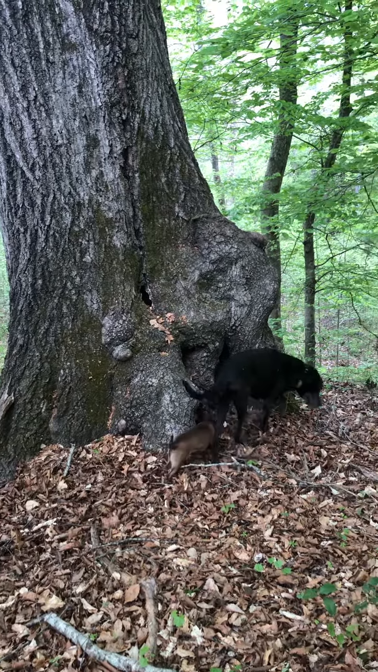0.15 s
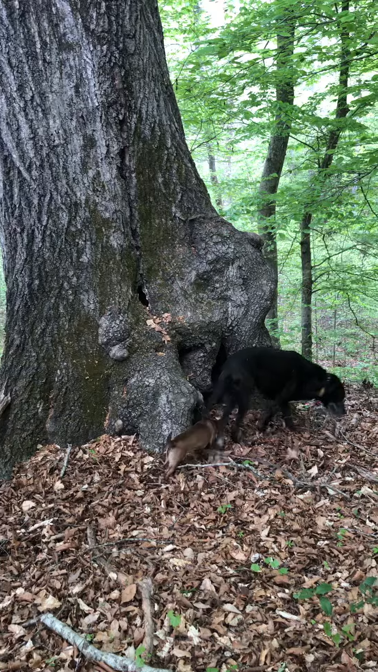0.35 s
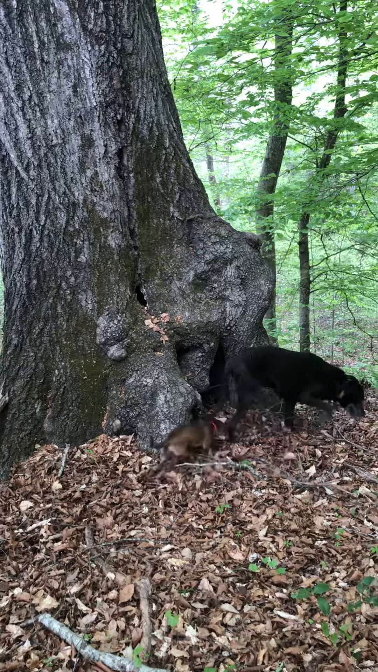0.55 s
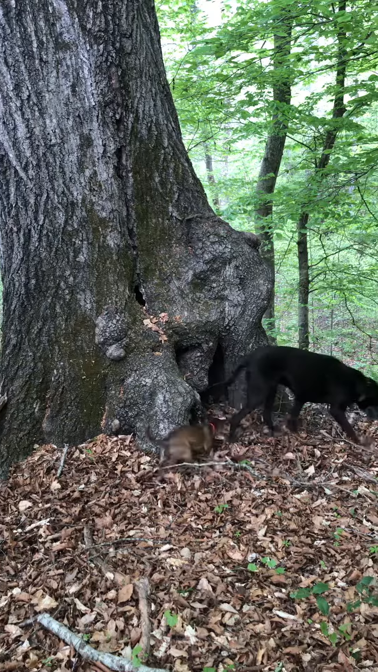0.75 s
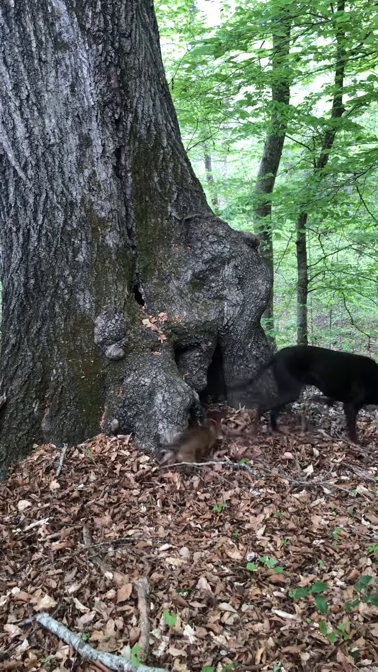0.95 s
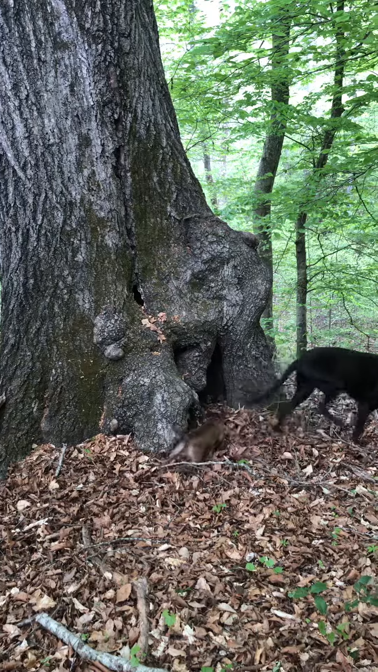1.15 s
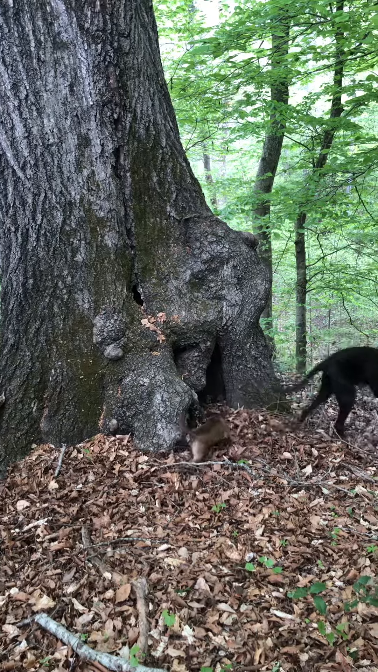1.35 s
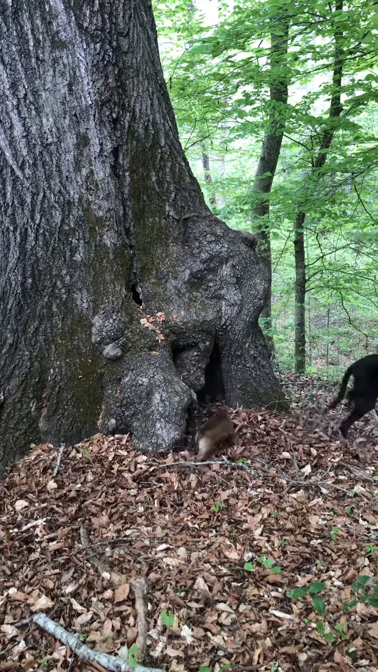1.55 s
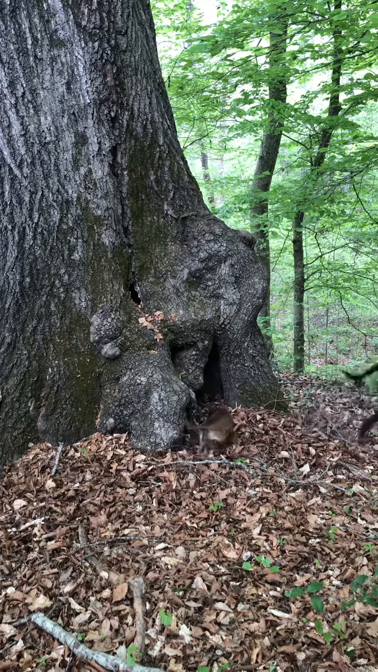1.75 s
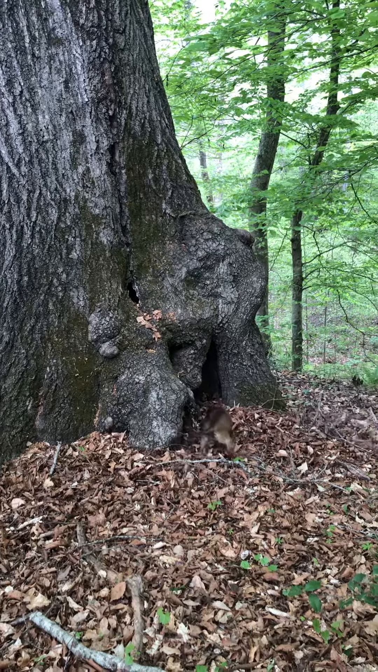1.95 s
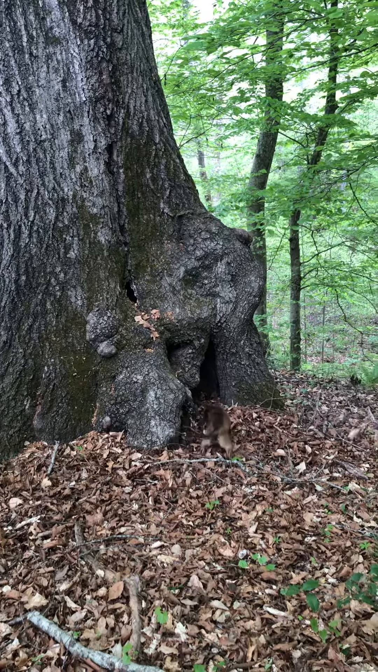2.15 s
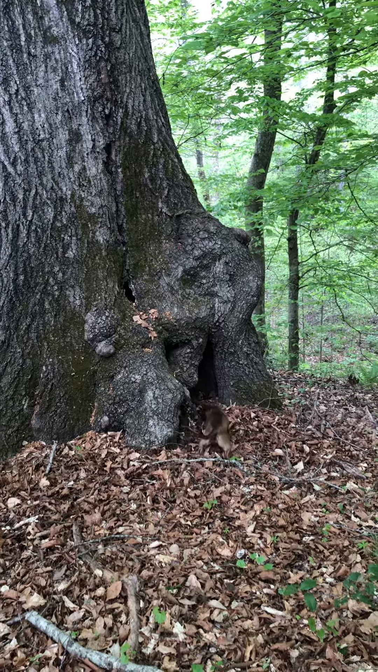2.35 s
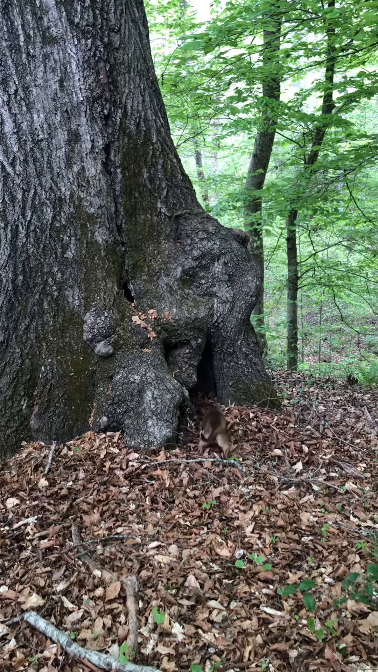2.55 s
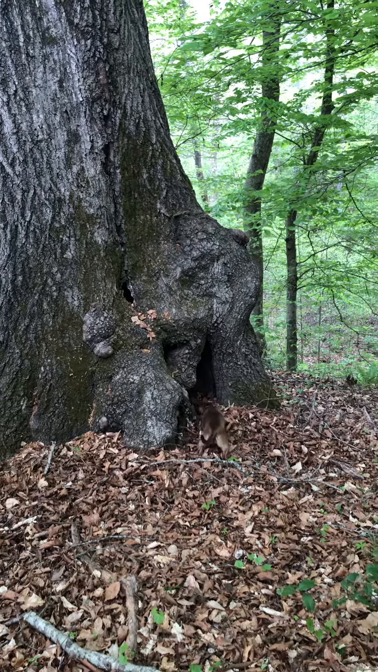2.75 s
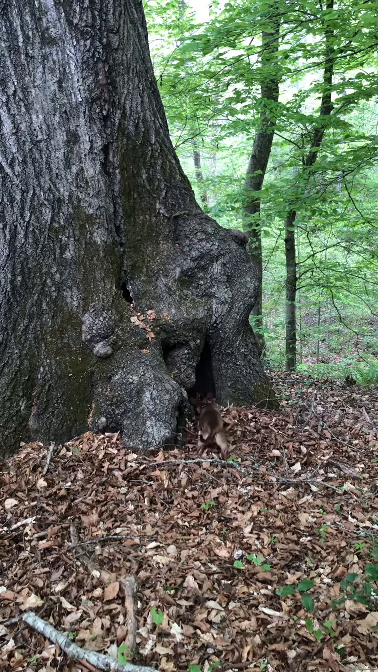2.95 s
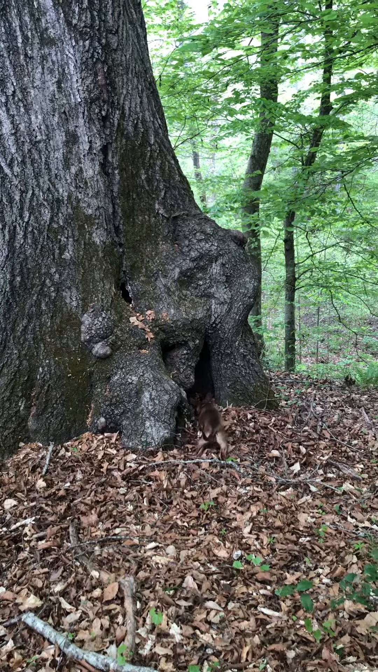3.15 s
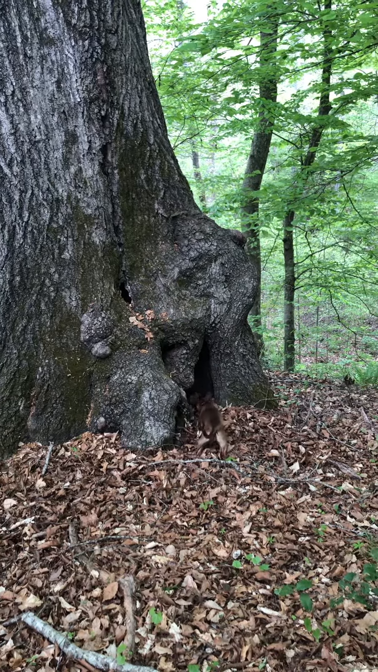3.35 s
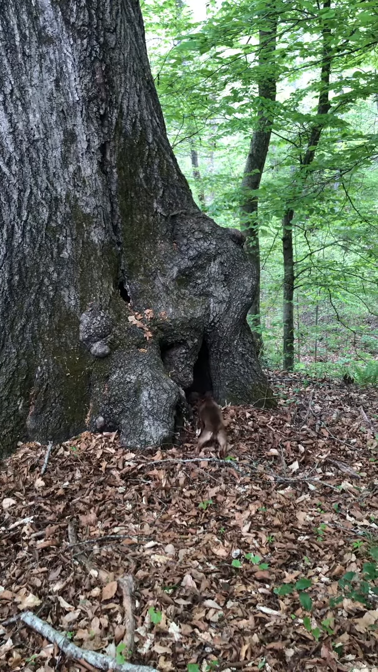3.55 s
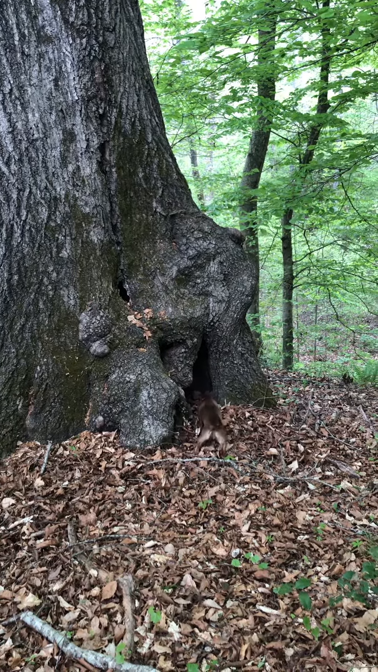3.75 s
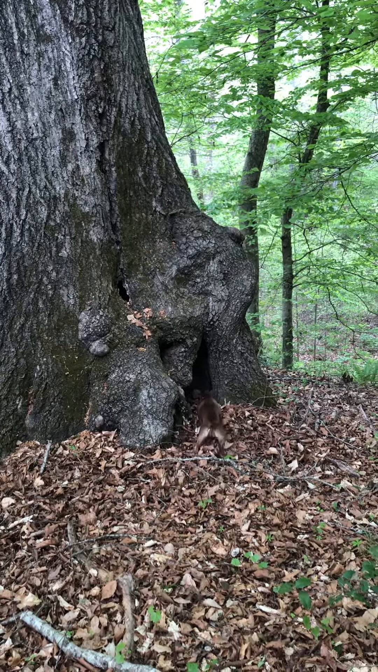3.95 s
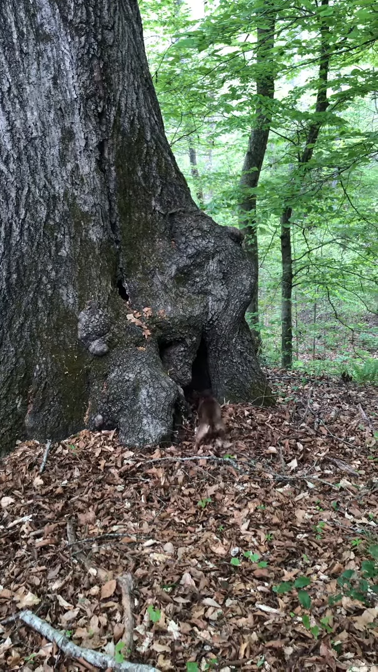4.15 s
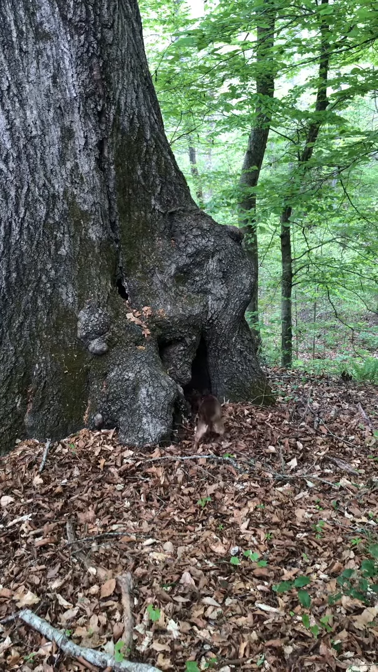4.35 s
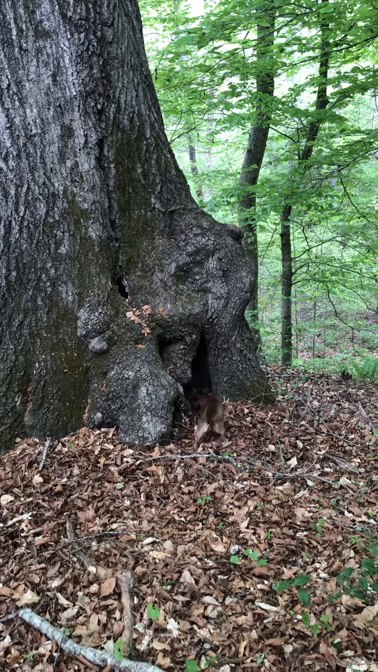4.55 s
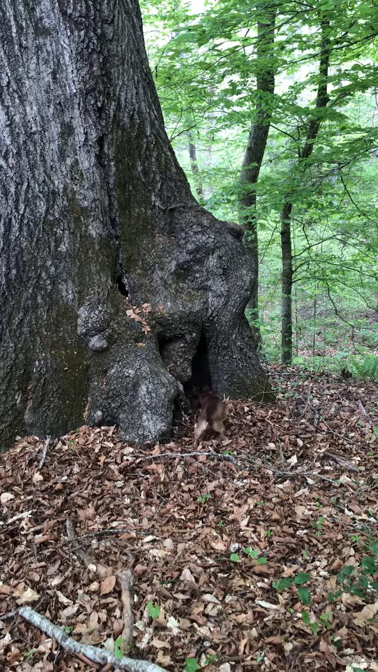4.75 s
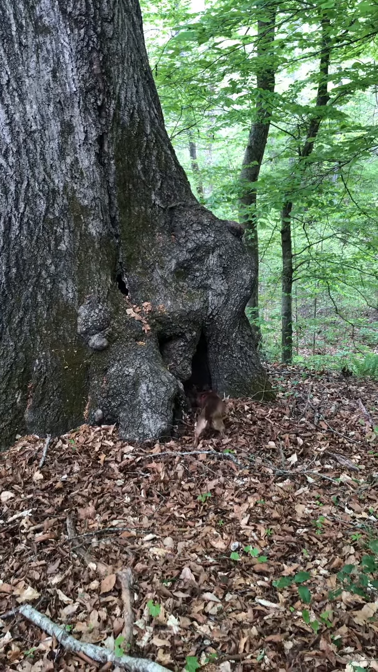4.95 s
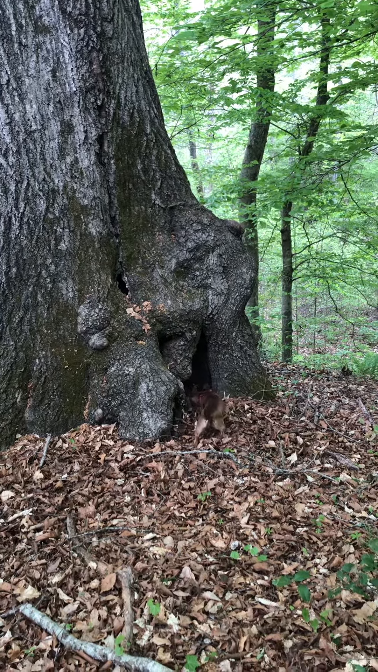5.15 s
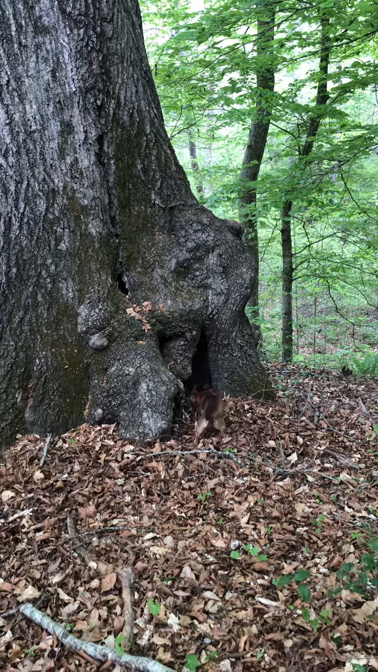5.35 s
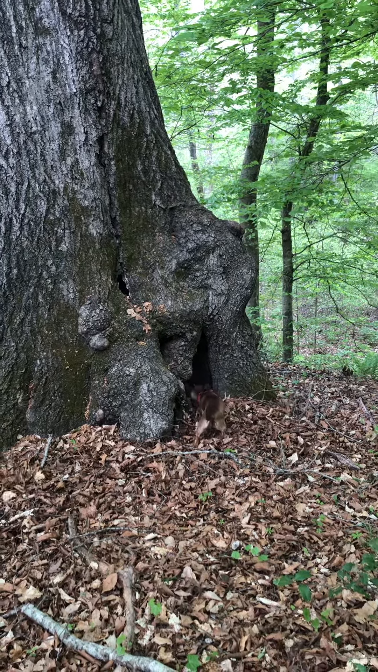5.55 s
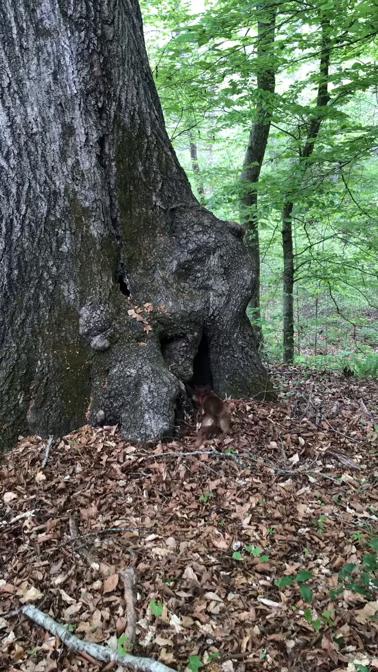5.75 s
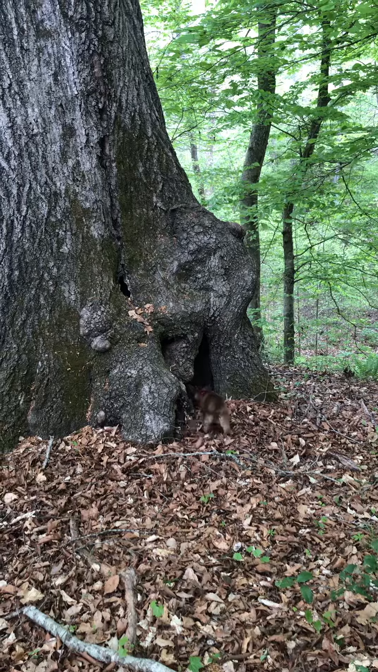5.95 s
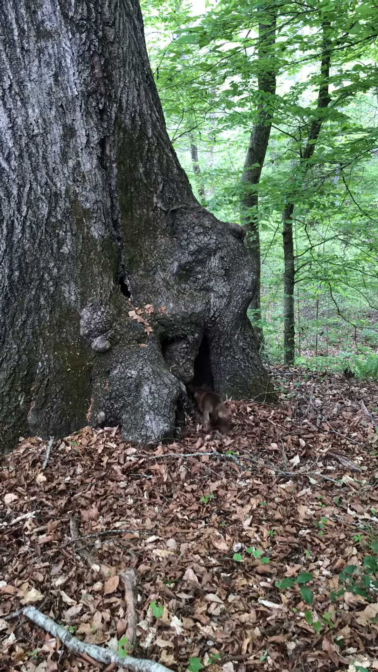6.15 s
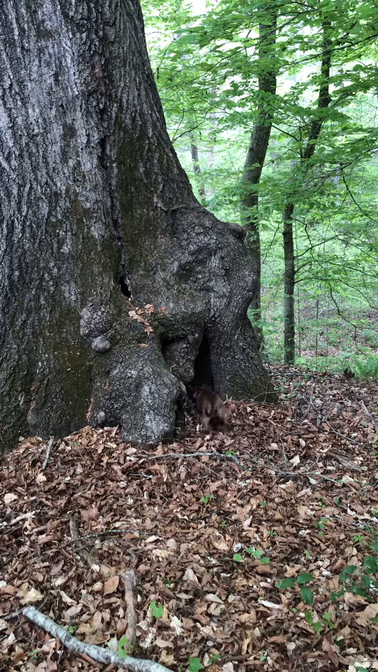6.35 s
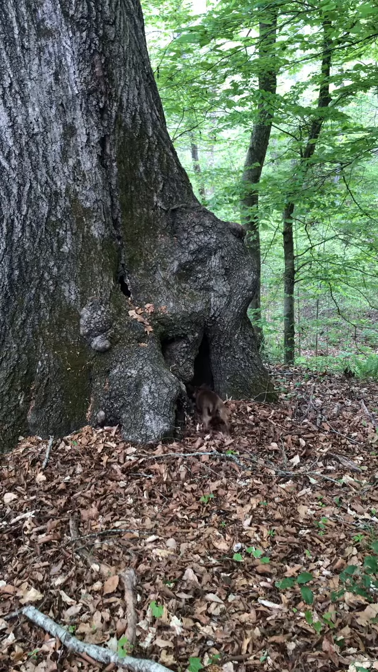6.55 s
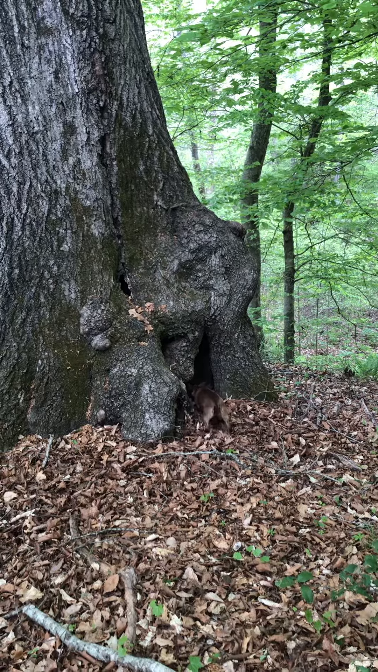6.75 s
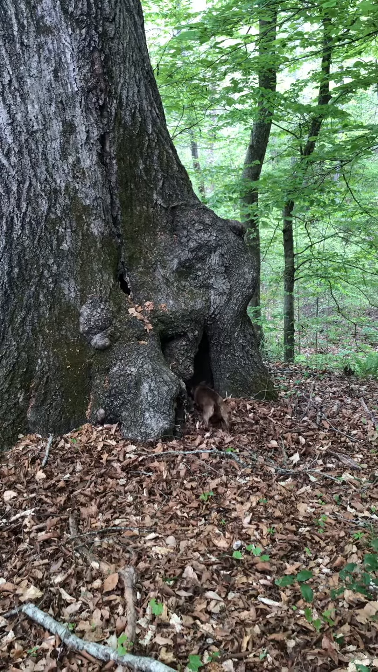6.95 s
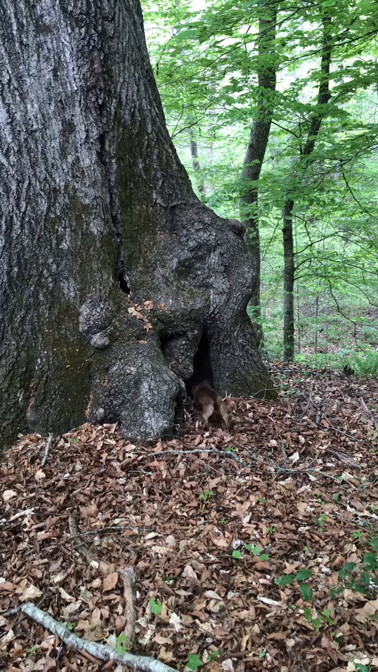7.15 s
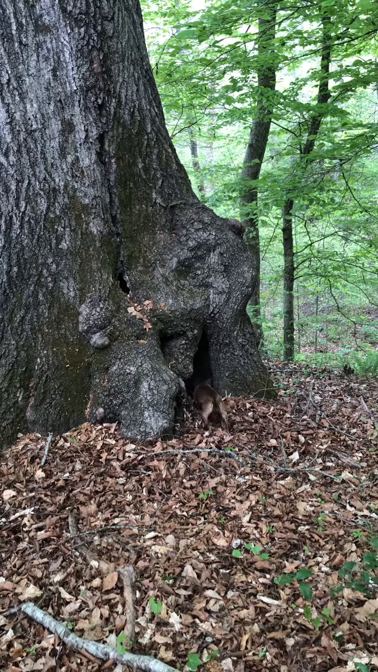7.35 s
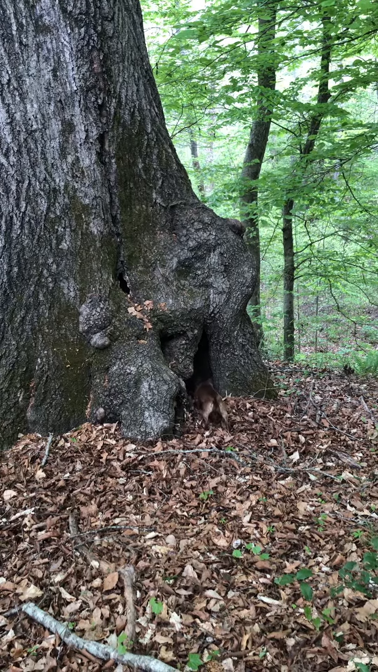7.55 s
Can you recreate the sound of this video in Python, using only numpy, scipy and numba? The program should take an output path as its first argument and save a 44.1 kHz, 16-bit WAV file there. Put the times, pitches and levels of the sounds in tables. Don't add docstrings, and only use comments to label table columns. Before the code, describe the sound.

In a forest, a big dog walks off through dry leaves some metres away, its paw strokes crunching in dense crackly bursts with sharp twig snaps. The crunching thins and fades to a brief hush, then a small dog scratches in a hollow, hesitantly at first, then busier. Faint bird whistles, a low hum and far traffic rumble lie behind, caught by a phone microphone.

```python
import sys
import numpy as np
from scipy import signal
from scipy.fft import rfft, irfft
from scipy.io import wavfile
from scipy.ndimage import uniform_filter1d
from numba import njit

SR = 44100
rng = np.random.default_rng(int(sys.argv[2]) if len(sys.argv) > 2 else 0)


def natural_amplitude(level_db):
    exponent = np.asarray(level_db, float) / 20
    return 10 ** exponent


def unload_wav(signal):
    wavfile.write(
        sys.argv[1],
        SR,
        np.round(np.clip(np.atleast_2d(signal).T, -1, 1) * 32767).astype(np.int16),
    )


N = 339129


def band(x, lo_hz, hi_hz):
    return signal.sosfilt(signal.butter(2, [lo_hz, min(hi_hz, 0.45 * SR)], "bandpass", fs=SR, output="sos"), x)


def level(x, db):
    return x * natural_amplitude(db) / np.sqrt(np.mean(x ** 2))


def lookup(spectrum, hz):
    f, db = np.transpose(spectrum)
    return np.interp(np.log(hz), np.log(f), db)


def walk(rate):
    hold = int(SR / rate)
    steps = np.repeat(rng.standard_normal(N // hold + 1), hold)
    return 4 / 3 * uniform_filter1d(uniform_filter1d(steps, hold), hold)[:N]


def decay(x, seconds):
    return signal.lfilter([1], [1, -np.exp(-1 / (seconds * SR))], x)


# [t/s, level/dB]
STIRRING = [(0.0, -68), (0.25, -55), (0.5, -47.5), (0.74, -50.5), (0.99, -49.5), (1.24, -58.5),
            (1.49, -45.5), (1.74, -52), (2.23, -58), (2.73, -60.5), (3.1, -54.5), (3.72, -64),
            (4.22, -60.5), (4.47, -80), (4.7, -72.5), (5.0, -78.5), (6.3, -69), (7.69, -60)]
# [crest t/s, level/dB, rise/ms, fall/ms]
PAW_STEPS = [(0.046, -49, 42, 67), (0.215, -44, 20, 80), (0.508, -45, 55, 39), (0.686, -40.5, 22, 38),
             (0.856, -45.5, 65, 43), (1.178, -46, 19, 46), (1.291, -42, 31, 78), (1.513, -50, 17, 13),
             (1.888, -46.5, 103, 30), (1.993, -49.5, 19, 40), (2.136, -49.5, 37, 26),
             (2.321, -48.5, 28, 30), (2.442, -56.5, 37, 16), (2.578, -50.5, 16, 27), (2.612, -51, 13, 24),
             (2.841, -55.5, 6.2, 9), (2.954, -53, 8, 56), (3.07, -47, 22, 35), (3.125, -51.5, 14, 15),
             (3.186, -53.5, 9, 16), (3.396, -50, 25, 36), (3.668, -51.5, 20, 49), (4.02, -52.5, 97, 27),
             (4.168, -58.5, 5.5, 37), (4.23, -59, 15, 15), (4.28, -56.5, 25, 19), (4.397, -56, 29, 81)]
# [crest t/s, level/dB, rise/ms, fall/ms]
PAW_SCRAPES = [(4.765, -76, 5, 82), (4.909, -75, 44, 9), (5.052, -73, 7, 12), (5.29, -68, 31, 20),
               (5.605, -72.5, 56, 10), (5.745, -59, 26, 69), (5.901, -51, 10.5, 46), (6.0, -56, 9.1, 20),
               (6.084, -57, 61, 103), (6.435, -57.5, 61, 8.9), (6.498, -53, 12, 39), (6.57, -61.5, 120, 60),
               (6.657, -52.5, 7.6, 26), (6.76, -64, 83, 69), (6.866, -50, 46, 17), (6.969, -48, 23, 65),
               (7.17, -54.5, 190, 84), (7.24, -56, 8, 91), (7.325, -52.5, 17, 40), (7.41, -49, 20, 28),
               (7.533, -52, 28, 39), (7.673, -53, 22, 150)]


def effort():
    t = np.arange(N) / SR
    stir_db = np.interp(t, *np.transpose(STIRRING))
    dull_db = 0.29 * np.maximum(-54.5 - stir_db, 0)
    tilt_db = np.array([-8.5 + dull_db, 0 * t, -2.5 - 0.37 * dull_db])
    power = natural_amplitude(2 * (stir_db + tilt_db))
    for strokes, low_db, thin_db in ((PAW_STEPS, -10, -1), (PAW_SCRAPES, -9.5, -2)):
        for crest, db, rise_ms, fall_ms in strokes:
            first = max(0, int((crest - 0.004 * rise_ms) * SR))
            near = slice(first, int((crest + 0.004 * fall_ms) * SR))
            ms = 1000 * (t[near] - crest)
            swell = np.exp(-(ms / np.where(ms < 0, rise_ms, fall_ms)) ** 2)
            power[:, near] += natural_amplitude(2 * (db + np.array([[low_db], [0], [thin_db]]))) * swell
    settle_db, settle_s = -12.5, 0.046
    keep = np.exp(-1 / (settle_s * SR))
    return power + natural_amplitude(2 * settle_db) * signal.lfilter([1 - keep], [1, -keep], power)


@njit
def rings(start, hz, cycles, size):
    out = np.zeros(N)
    for k in range(len(start)):
        turn = np.exp((2j * np.pi - 1 / cycles[k]) * hz[k] / SR)
        z = size[k] + 0j
        for i in range(int(start[k]), min(N, int(start[k] + 6 * cycles[k] * SR / hz[k]) + 2)):
            z *= turn
            out[i] += z.imag
    return out


# [f/Hz, level/dB per Hz]
LEAF_COLOUR = [(120, -24), (200, 3), (227, -1.5), (340, -19.5), (465, -7.5), (821, -11), (1100, -8),
               (2210, -4.5), (3430, 0.5), (4680, 0), (11100, -2.5), (13300, -0.5), (16000, -4.5)]


def swarm(spread_db, cycles, patchy_db, clump_db, rub_db, buckle):
    cracks_per_s = 14000
    chance = rng.random((int(cracks_per_s * N / SR), 5)).T
    start, hz = chance[0] * N, 250 * 64 ** chance[1]
    strength = np.minimum(-np.log(chance[2] + 1e-9), 6.5)
    turns = cycles * 6 ** chance[4]
    size = hz * natural_amplitude(lookup(LEAF_COLOUR, hz) + spread_db * strength) / np.sqrt(turns)
    size = size * np.sign(chance[3] - 0.5)
    bins = np.fft.rfftfreq(N, 1 / SR) + 1
    rub = irfft(rfft(rng.standard_normal(N)) * natural_amplitude(lookup(LEAF_COLOUR, bins)), N)
    buckles = (rng.random(N) < 90 / SR) * rng.random(N) ** 2
    patches = natural_amplitude(patchy_db * walk(35)) * (1 + buckle * decay(buckles, 0.0051))
    parts = []
    for lo, hi in ((200, 1900), (1900, 8000), (8000, 17000)):
        m = (hz >= lo) & (hz < hi)
        cracks = rings(start[m], hz[m], turns[m], size[m])
        both = level(cracks, 0) + level(band(rub, lo, hi), rub_db)
        edges = np.geomspace(0.8 * lo, 1.2 * hi, 6)
        clumps = 0
        for k in range(5):
            clumps = clumps + (-1) ** k * band(both, *edges[k:k + 2]) * natural_amplitude(clump_db * walk(28))
        parts.append(level(clumps * patches, 0))
    return parts


def leaves():
    at, peak_db, _, body_db, edge_db, after_db = np.transpose(all_snaps())
    parts = swarm(spread_db=2.1, cycles=0.9, patchy_db=0.7, clump_db=1.3, rub_db=-3.5, buckle=0.85)
    tilts_db = (0.7 * body_db - 1, -7, 0.7 * edge_db + 1)
    out = 0
    for part, steady, part_db, tilt_db in zip(parts, effort(), (1.6, 1.5, 1.4), tilts_db):
        kicks = np.zeros(N)
        kicks[(at * SR).astype(int) + 60] = natural_amplitude(peak_db + after_db + tilt_db)
        flare = decay(kicks, 0.008)
        out = out + part * np.sqrt(natural_amplitude(2 * part_db) * steady + flare ** 2)
    return out


# [t/s, peak level/dB, ring f/Hz, crackle level/dB after it]
TWIG_BREAKS = [(0.1017, -23, 5040, -21), (0.2232, -19, 5000, -14), (0.2374, -15, 4340, -12),
               (0.2942, -10, 12800, -19), (0.9697, -24.5, 5460, -15), (1.1727, -27, 4210, -20),
               (2.0847, -30, 4790, -21), (2.2318, -41, 3960, -19), (2.4857, -40, 4550, -11),
               (2.7077, -38, 1210, -9), (2.9816, -32, 5700, -7), (3.3677, -46, 4590, -24),
               (3.1777, -29, 3350, -22), (4.6533, -47, 2500, -18), (0.2958, -17, 900, -26),
               (6.3389, -38.5, 1470, -12), (6.499, -26.5, 3350, -28), (6.6492, -42, 3120, -19),
               (6.7839, -39, 1100, -13), (6.9345, -39.5, 2860, -9), (7.0822, -35, 7240, -11),
               (7.16, -28.5, 5240, -11.5)]
# [t/s, peak level/dB, ring f/Hz, crackle level/dB after it]
LEAF_SPLITS = [(0.0388, -25.5, 4140, -9.5), (0.2036, -31, 4800, -7), (0.4199, -30, 6440, -13),
               (0.5003, -21, 5550, -8.5), (0.6594, -20, 12700, -23), (0.8076, -16, 11000, -15),
               (0.8081, -14.5, 3840, -19.5), (1.5459, -20, 13000, -16), (1.7734, -21, 3220, -15),
               (1.7864, -32, 5920, -22), (2.1196, -26.5, 5460, -10.5), (2.1274, -30, 7290, -20),
               (2.3067, -37, 7210, -16), (2.4354, -31, 4670, -11.5), (2.5651, -45, 3380, -13),
               (2.7377, -46, 4760, -8), (2.9432, -31, 3220, -10), (3.6287, -36, 4620, -15),
               (3.6804, -26, 7630, -20), (3.9554, -29, 3440, -17), (4.4184, -34, 5630, -16),
               (5.5747, -41, 5800, -19), (4.8638, -51, 3510, -19), (5.3378, -48, 3260, -19),
               (6.3713, -37, 5000, -24), (6.8188, -24.5, 4940, -11.5), (6.961, -25, 4220, -19),
               (7.2229, -20, 5200, -21), (7.4858, -28, 5300, -16), (0.7355, -17, 6000, -14.5)]
# [t/s, peak level/dB, ring f/Hz, crackle level/dB after it]
LEAF_POPS = [(0.2626, -21, 12500, -18), (0.5711, -28, 3550, -17), (1.2615, -32, 6990, -19),
             (1.2101, -20, 3880, -22), (1.6965, -28, 8300, -19), (1.9021, -26.5, 3530, -13),
             (3.0624, -30, 3610, -17), (3.3847, -34, 6400, -24), (3.5478, -35, 9500, -21),
             (3.6646, -21.5, 6550, -16), (3.8661, -42, 7260, -19), (3.8911, -37, 4640, -21),
             (4.1649, -31.5, 5100, -10), (4.2283, -37, 9600, -10), (4.7656, -52, 4260, -19),
             (4.9033, -43, 5150, -15), (5.1093, -53, 6000, -19), (5.5749, -39, 13800, -25),
             (5.3926, -54, 3270, -19), (5.7233, -40, 3760, -19), (5.7951, -38, 3300, -21),
             (5.8949, -27.5, 4530, -23), (5.9937, -38, 3250, -23), (6.5315, -39, 4290, -19),
             (7.0378, -33, 7100, -6), (7.3596, -31, 5420, -19), (7.6729, -22.5, 6860, -17)]
# [t/s, peak level/dB, ring f/Hz, crackle level/dB after it]
STICK_KNOCKS = [
    (0.1476, -25, 2270, -19),
    (0.387, -23, 2200, -35),
    (1.0929, -33, 3300, -26),
    (3.2884, -35, 2500, -29),
    (4.7017, -51, 2400, -19),
    (7.386, -41, 3250, -4.5),
]


def all_snaps():
    kinds = [(TWIG_BREAKS, -14, -10.5), (LEAF_SPLITS, -25, -6.5), (LEAF_POPS, -33, -18), (STICK_KNOCKS, -7, -36)]
    rows = []
    for table, body_db, edge_db in kinds:
        for s, peak_db, hz, after_db in table:
            rows.append((s, peak_db, hz, body_db, edge_db, after_db))
    return rows


def snaps():
    out, t, rows = np.zeros(N + 1024), np.arange(1024) / SR, all_snaps()
    noises = rng.standard_normal((len(rows), 3, 1024))
    for (s, peak_db, hz, body_db, edge_db, _), noise in zip(rows, noises):
        ring = band(noise[0] * np.exp(-t / 0.0004), hz * 0.92 - 350, hz * 1.08 + 600)
        body = band(noise[1] * np.exp(-t / 0.002), 860, 4040)
        edge = band(noise[2] * np.exp(-t / 0.0005), 3500, 17000)
        ring, body, edge = (v / np.abs(v).max() for v in (ring, body, edge))
        snap = ring + natural_amplitude(body_db + 9.0) * body + natural_amplitude(edge_db + 13.0) * edge
        out[int((s + 0.0008) * SR):][:1024] += natural_amplitude(peak_db - 2.9) * snap / np.abs(snap).max()
    return out[:N]


# [start t/s, end t/s, start f/Hz, end f/Hz, level/dB]
BIRD_WHISTLES = [ (2.46, 2.62, 1330, 1300, -71), (2.76, 2.83, 7190, 7170, -62),
                 (2.85, 2.95, 7170, 7150, -68), (2.80, 2.85, 6500, 6050, -64),
                 (4.05, 4.16, 2560, 2545, -66), (4.605, 4.64, 2870, 2860, -79),
                 (4.685, 4.72, 2840, 2830, -78), (4.765, 4.79, 4320, 4300, -77),
                 (4.75, 4.91, 3450, 3300, -78), (4.86, 5.04, 3350, 3110, -76),
                 (5.01, 5.10, 3110, 2980, -83), (4.99, 5.31, 1720, 1620, -79.5), ]


def birds():
    out, t = np.zeros(N), np.arange(N) / SR
    waver, flutter = walk(60), walk(70)
    for t0, t1, hz0, hz1, db in BIRD_WHISTLES:
        m = (t > t0) & (t < t1)
        u = (t[m] - t0) / (t1 - t0)
        hz = (hz0 + (hz1 - hz0) * u) * (1 + 0.0063 * waver[m])
        phase = 2 * np.pi * np.cumsum(hz) / SR
        out[m] += natural_amplitude(db + 3 + 3 * flutter[m]) * np.sin(np.pi * u) ** 0.5 * np.sin(phase)
    return out


# [f/Hz, level/dB per Hz]
FOREST_COLOUR = [(15, -39), (25, -1.5), (117, 0.5), (206, -3), (263, -11), (427, -12), (677, -19.5),
                 (1230, -25), (1650, -23), (2760, -29.5), (3250, -6), (4030, -49), (14000, -50),
                 (16000, -28)]


def forest():
    air, swell, t = 0, walk(0.26), np.arange(N) / SR
    for hz in 30 * 2 ** np.arange(0, 9.1, 0.5):
        band_db = lookup(FOREST_COLOUR, hz) + 10 * np.log10(hz)
        noise = level(band(rng.standard_normal(N), hz / 1.22, hz * 1.184), band_db)
        air = air + noise * natural_amplitude(0.5 * swell + 1.5 * walk(3.01))
    near_s, pass_s = 2.6, 1.1
    drone_db = -66 + 5.5 * np.exp(-((t - near_s) / pass_s) ** 2) + 2.6 * walk(3.5)
    drone = level(band(rng.standard_normal(N), 71.5, 99), -4.0) * natural_amplitude(drone_db)
    hum_hz, hum_db = 202.4, -71
    hum = natural_amplitude(hum_db + 3 + 2.4 * walk(12)) * np.sin(2 * np.pi * np.cumsum(hum_hz + 1.51 * walk(6)) / SR)
    return level(air, -62) + drone + hum


def scene():
    return (leaves() + snaps() + birds() + forest())[None]


def low_pass(x):
    return signal.sosfilt(signal.butter(12, 16970, fs=SR, output="sos"), x)


def record(dry):
    x = signal.sosfilt(signal.butter(4, 44.7, "highpass", fs=SR, output="sos"), dry)
    x = signal.sosfilt(signal.ellip(12, 0.2, 45, 15850, fs=SR, output="sos"), x)
    return low_pass(x)


dry = scene()
out = record(dry)
unload_wav(out)
```